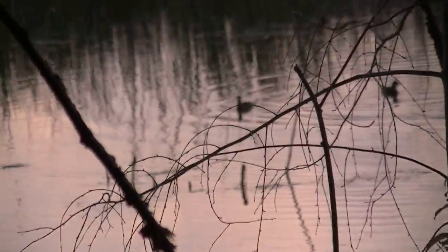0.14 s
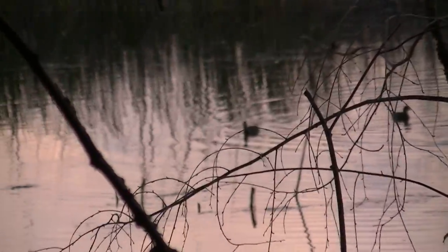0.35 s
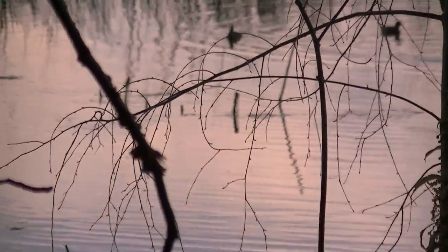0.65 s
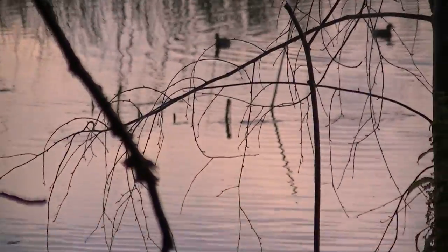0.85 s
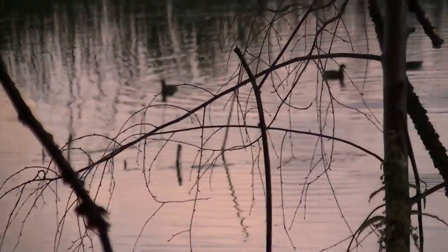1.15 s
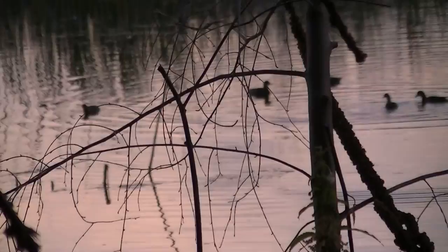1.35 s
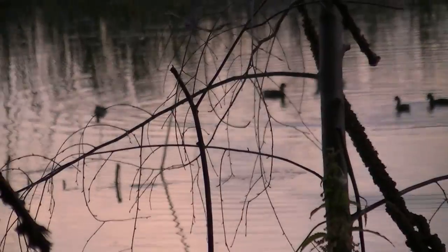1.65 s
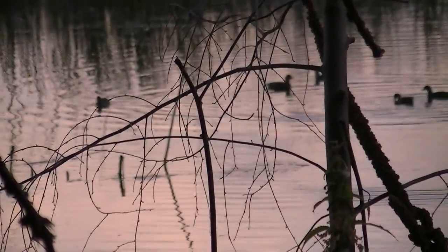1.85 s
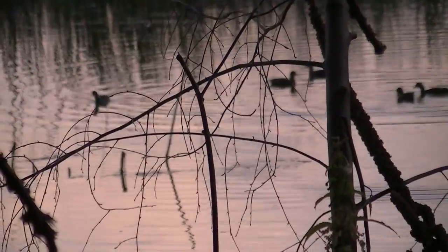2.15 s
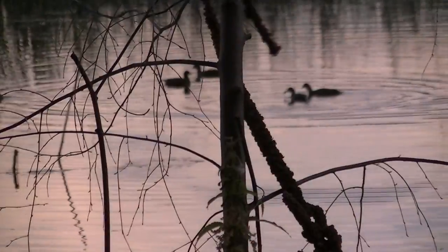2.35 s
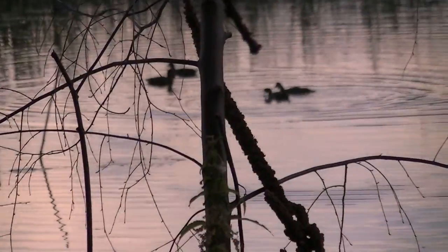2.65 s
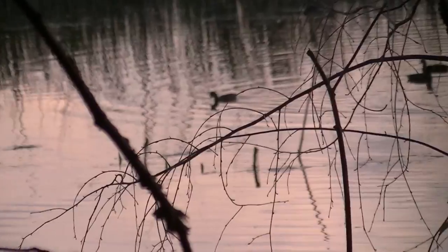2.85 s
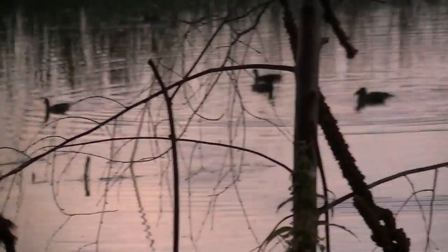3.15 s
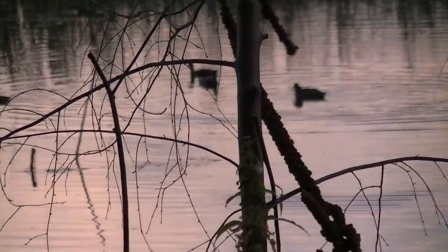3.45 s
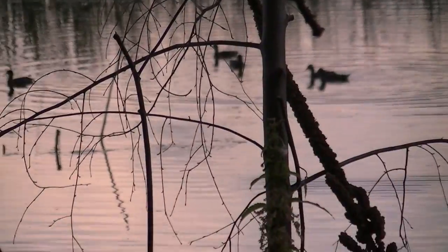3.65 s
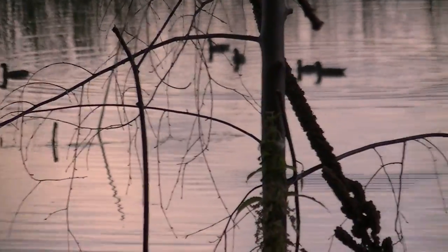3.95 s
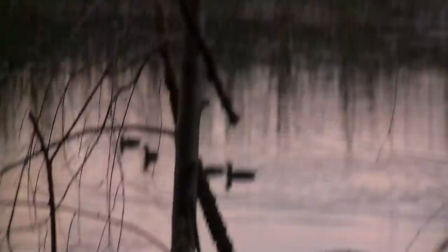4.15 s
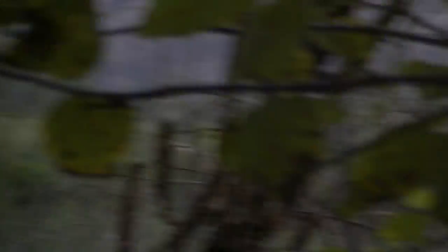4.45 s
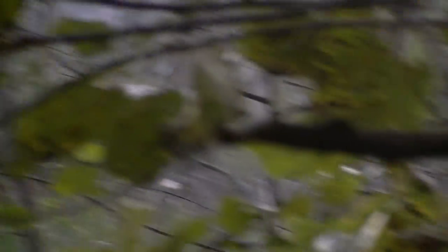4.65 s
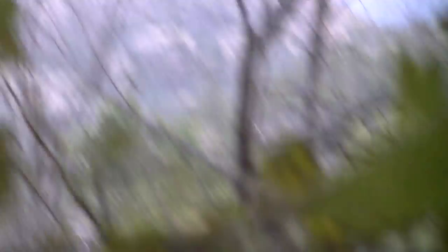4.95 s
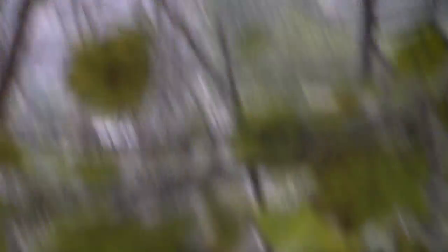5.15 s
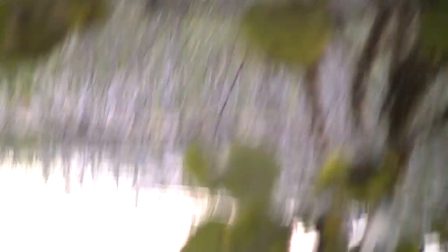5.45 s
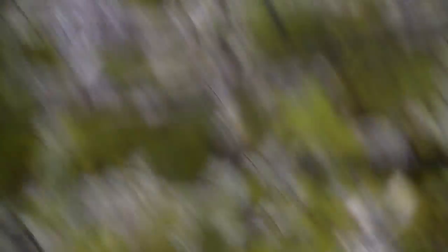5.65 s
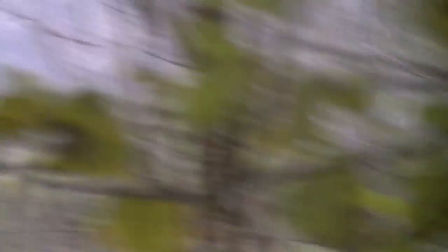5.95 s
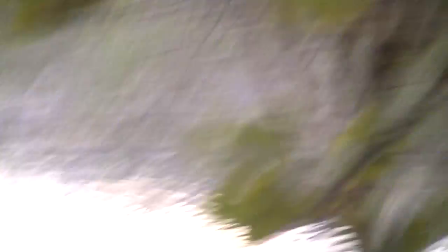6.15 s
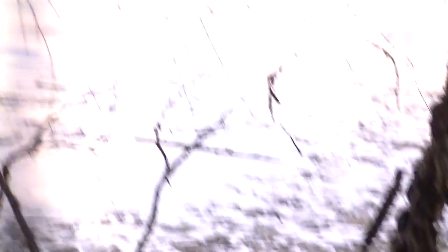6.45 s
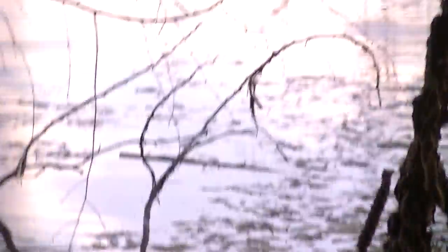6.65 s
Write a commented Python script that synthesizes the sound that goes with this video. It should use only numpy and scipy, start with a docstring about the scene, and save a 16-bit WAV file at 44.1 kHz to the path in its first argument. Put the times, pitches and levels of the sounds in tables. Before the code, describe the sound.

Dry twigs snap, knock and scrape close to the microphone in irregular bursts, with leaves rustling over a faint distant wash of air and water.

```python
"""A short rub of wood opens over a soft, distant wash of air and water: a pond bank, dry twigs and leaves close by.
A hand-held camera is pushed about among them: twigs snap and knock, bark and leaves drag past in short strokes,
a thick branch hisses along the camera body, and late on leaf stalks twang.
Wood, fibres, hiss and wash have a part both microphone ports share and a part that differs;
a stalk sends the same ring to both parts. Wood is ringing modes, leaves are noise bursts, strokes are random slips."""
import sys
import numpy as np
from scipy import signal
from scipy.fft import rfft, irfft, next_fast_len
from scipy.io import wavfile
from scipy.ndimage import uniform_filter1d

SR = 44100
rng = np.random.default_rng(int(sys.argv[2]) if len(sys.argv) > 2 else 0)


def unload_wav(signal):
    """Save mono or channel-first audio to the path in sys.argv[1] as 16-bit WAV at rate SR, clipped to [-1, 1]."""
    wavfile.write(
        sys.argv[1],
        SR,
        np.round(np.clip(np.atleast_2d(signal).T, -1, 1) * 32767).astype(np.int16),
    )


N = 299439
# Sounds have two rows, the shared and the unshared part; their levels are those ahead of the ports.


def gain_of(db):
    """Decibels to gain."""
    return 10 ** (np.asarray(db) / 20)


def evened(x):
    """Scales to rms 1."""
    return x / np.sqrt(np.mean(x ** 2) + 1e-20)


def read(points, hz):
    """Reads a table on a log-frequency axis."""
    f, value = np.transpose(points)
    return np.interp(np.log(hz + 1), np.log(f + 1), value)


def colour(x, points):
    """Filters by a spectrum in dB without delay."""
    size = next_fast_len(x.shape[-1])
    gain = gain_of(read(points, np.fft.rfftfreq(size, 1 / SR)))
    return irfft(rfft(x, size) * gain, size)[..., :x.shape[-1]]


def add(mix, s, sound):
    """Mixes a sound in at s seconds."""
    part = mix[:, round(s * SR):][:, :sound.shape[1]]
    part += sound[:, :part.shape[1]]


def wash():
    """Distant wash of air and water: coloured noise whose patches drift in time and frequency."""
    # spectrum of the far wash: (f/Hz, density/dB per Hz)
    wash_spectrum = [(60, -19), (301, -18.5), (458, -4.5), (651, -2.5), (880, 2.5), (1110, -3), (1310, -2),
                     (7060, -24.5), (16000, -45)]
    # level of the far wash: (t/s, level/dB)
    wash_level = [(0, -53), (1.3, -49.5), (1.8, -54), (3.6, -51.5), (4.2, -49), (6.79, -49.5)]
    a, b, c, d, patches = rng.standard_normal((N // 256 + 5, 513, 5)).T
    patches = uniform_filter1d(patches, size=14, axis=0)  # across frequency
    patches = evened(uniform_filter1d(patches, size=10, axis=1))  # along time
    spectrum_db = read(wash_spectrum, np.fft.rfftfreq(1024, 1 / SR))[:, None]
    z = np.array([a + 1j * b, c + 1j * d]) * gain_of(spectrum_db + 2.3 * patches)
    noise = signal.istft(z, nperseg=1024, noverlap=768)[1][:, :N]
    level_db = np.interp(np.arange(N) / SR, *np.transpose(wash_level))
    return gain_of(level_db) * evened(noise)


def ring(pitch_hz, hold, db_per_octave=9.0, detune=0.122, contact_s=0.0027, chatter=0.11,
         blow=4.8, blow_s=0.00088, size=10):
    """A blow and its chatter ring the wood; modes near the pitch of the struck part speak loudest."""
    # modes of the wood ahead of detuning, pitch and hold: (f/Hz, level/dB, 60 dB decay/s)
    wood_modes = [(333, -25, 0.03), (589, -12.5, 0.1), (907, 2, 0.052), (1180, -0.5, 0.015),
                  (1580, 5, 0.048), (2050, 5.5, 0.022), (2360, -3, 0.097), (3400, -1.5, 0.026),
                  (4230, -5.5, 0.022)]
    t = np.arange(3000) / SR
    hz, db, t60 = np.transpose(wood_modes)[:, :, None]
    hz = hz * (1 + detune * (2 * rng.random((2, 4) + hz.shape) - 1))  # four close neighbours a mode
    db = db - db_per_octave * abs(np.log2(hz / pitch_hz)) - 60 * t / (t60 * hold)
    polarity = rng.choice([-1, 1], hz.shape)
    modes = (gain_of(db) * np.cos(2 * np.pi * hz * t) * polarity).sum((1, 2))
    modes = modes * (1 + blow * np.exp(-t / blow_s))  # the first swings stand out above the ring
    rattle = rng.standard_normal((2, 400)) * np.exp(-t[:400] / contact_s)
    strike = (t[:400] == 0) + chatter * rattle
    # wood gives a little under the blow
    soft = signal.oaconvolve(strike, signal.windows.hann(M=size)[None], axes=1)
    # thin twigs send out little bass
    thin = signal.butter(N=3, Wn=pitch_hz / 2.5, btype="high", fs=SR, output="sos")
    return signal.sosfilt(thin, signal.fftconvolve(modes, soft, axes=1)[:, :3000])


def fibres(t60, crisp_db=0., rise_s=0.000096, patchy_db=7.0):
    """A burst of fast-dying noise, each with its own colour; crisp_db tilts it per octave about 5 kHz."""
    # leaf spectrum ahead of tilt and patches: (f/Hz, density/dB per Hz)
    leaf_spectrum = [(300, -29), (1500, -3.5), (2800, 1.5), (4200, -4.5), (5000, -6), (6100, -10.5),
                     (7600, -20), (8800, -19.5), (11000, -28.5), (12300, -32), (16000, -52)]
    t, (hz, db) = np.arange(3000) / SR, np.transpose(leaf_spectrum)
    db = db + crisp_db * np.log2(hz / 5000) + patchy_db * rng.standard_normal(len(hz))
    noise = colour(rng.standard_normal((2, 3000)), np.transpose([hz, db]))
    return noise * gain_of(-60 * t / t60) * (1 - np.exp(-t / rise_s)) ** 2


def slips(per_s, spread_db, voices, level):
    """Random stick-slip clicks of uneven size under a level curve, each sounding one of the given voices."""
    happens = rng.random(N) < per_s / SR
    size = gain_of(spread_db * np.minimum(rng.exponential(1, N), 4)) * happens
    size = level * evened(size)
    pick = rng.integers(0, len(voices), N)
    out = np.zeros((2, N))
    for k, voice in enumerate(voices):
        clicks = (size * (pick == k))[None]
        out += signal.oaconvolve(clicks, voice / np.linalg.norm(voice[0]), axes=1)[:, :N]
    return out


def contact():
    """Most strokes swell to a turn and ease off, some stay level or dip there; rows: three woods, two leaves."""
    # strokes past the camera, levels ahead of sharing, smoothing and surges: (start t/s, length/s,
    # turn as share of length 0-1, wood level/dB at the turn, leaf level/dB at the turn,
    # drop from the turn to the ends/dB (below 0: a rise), thinness of the wood 0-1)
    drags = [(0, 0.017, 0, -27, -47, 40, 0.33), (0.528, 0.059, 0.4, -38.5, -71, 9.5, 0.27),
             (0.616, 0.067, 0, -24.5, -54, 25.5, 0), (0.836, 0.077, 0.1, -34, -69, 27, 0.9),
             (1.048, 0.07, 0.74, -23, -49, 12, 0.86), (1.166, 0.157, 0.14, -26, -51, 8.5, 0.66),
             (2.209, 0.071, 1, -27.5, -46.5, 18, 0.18), (2.741, 0.11, 0.45, -30.5, -49, 18, 0.04),
             (2.898, 0.064, 1, -42.5, -60, 10, 0.67), (3.011, 0.052, 0.5, -41, -62, -7, 0.22),
             (3.072, 0.12, 1, -34.5, -44.5, 15.5, 0.51), (3.385, 0.14, 0.07, -40.5, -52, 11.5, 0.07),
             (3.901, 0.3, 0.46, -46, -50.5, 12.5, 0.24), (4.201, 0.24, 0.07, -36, -50, 18, 0.14),
             (4.509, 0.085, 0.9, -44, -49.5, 11.5, 0.32), (5.096, 0.053, 0.5, -40.5, -40, 12, 0.46),
             (5.151, 0.05, 0.8, -56, -38.5, 14, 0.5), (5.255, .12, 0.1, -40.5, -31.5, 4, 0.14),
             (5.387, 0.11, 0.07, -41, -45.5, 19, 0.97), (5.465, 0.046, 0.4, -45, -37.5, 7, 0.93),
             (5.535, 0.52, 1, -40, -48, 25.5, 0.94), (6.097, 0.29, 0.1, -30, -51.5, 0, 0.17),
             (6.376, 0.088, 0.1, -25, -46, 4, 0.19), (6.459, 0.13, 0.96, -40.5, -68, 24, 0.25),
             (6.687, 0.14, 0.42, -27.5, -49.5, 16.5, 0.26)]
    # share of crisp leaves in the brush around the camera: (t/s, share 0-1)
    crispness = [(0, 0.65), (4.7, .05), (5.05, 1), (5.5, 1), (6.1, 0.55), (6.79, 1)]
    leaf_share = 0.35  # leaves follow the level course of a stroke less than wood does
    level = np.zeros((5, N))
    for start, length, turn, wood_db, leaf_db, end_drop_db, thin in drags:
        u = np.linspace(0, 1, round(length * SR))
        turn = np.clip(turn, 1 / SR, 1 - 1 / SR)
        drop_db = end_drop_db * np.maximum(1 - u / turn, (u - turn) / (1 - turn))
        rub = gain_of(wood_db - drop_db)
        rustle = gain_of(leaf_db - leaf_share * drop_db)
        crisp = np.interp(start, *np.transpose(crispness))
        woods = [np.interp(thin, [0, .2, 1], row) for row in np.eye(3)]  # thick, middling, thin
        share = np.clip(woods + [1 - crisp, crisp], 0, 1)[:, None]
        add(level, start, np.sqrt(share) * [rub, rub, rub, rustle, rustle])
    letting_go = np.exp(-1 / (0.0048 * SR))  # branches slide off gradually
    level = signal.lfilter([1 - letting_go], [1, -letting_go], level)
    surge = uniform_filter1d(rng.standard_normal(N), size=500)
    surge = evened(uniform_filter1d(surge, size=500))
    return level * gain_of(2.27 * surge)  # the contact surges unevenly


def strokes():
    """Dragging makes dense slips in thick, middling and thin wood, and finer ones in limp and crisp leaves."""
    wood = [[ring(hz * k, 0.82) for k in np.linspace(.8, 1.25, num=8)] for hz in (330, 900, 2200)]
    leaves = [[fibres(t60, tilt_db) for t60 in np.geomspace(.006, .03, num=16)] for tilt_db in (-4., 6.)]
    level = contact()
    rubbing = sum(slips(700, 3.82, voices, x) for voices, x in zip(wood, level))
    rustling = sum(slips(1500, 5.3, voices, x) for voices, x in zip(leaves, level[3:]))
    # thin twigs and limp leaves tick now and then throughout
    stray = slips(23, 3.3, wood[-1] + leaves[0], gain_of(-63))
    return rubbing + rustling + stray


def snaps():
    """Each breaking twig is a ring of wood with a crack of splitting fibres on top."""
    # twigs break: (t/s, peak wood level/dB, struck part f/Hz, peak crack level/dB)
    breaks = [(0.521, -17, 665, -35), (0.531, -15.5, 1550, -35), (0.667, -19.5, 1030, -30),
              (0.694, -29, 2500, -31), (0.875, -26, 1400, -39), (0.987, -29, 2100, -34.5),
              (1.046, -18.5, 970, -31), (1.086, -16, 1740, -41), (1.158, -15, 1900, -29),
              (1.317, -23, 1600, -35), (1.57, -35.5, 1500, -38), (1.681, -25.5, 1400, -35),
              (1.69, -26, 1170, -32.5), (2.272, -18.5, 1210, -20.5), (2.606, -26.5, 1520, -31.5),
              (4.087, -20, 1700, -19), (4.243, -23, 1030, -26.5), (4.288, -34, 890, -25.5),
              (4.379, -13.5, 1170, -34), (4.385, -13, 970, -23.5), (4.418, -16.5, 882, -33.5),
              (4.552, -30.5, 3160, -29), (4.615, -26, 1420, -28), (5.12, -33, 2130, -33),
              (5.184, -32, 2300, -33), (5.223, -44, 2050, -31), (5.249, -17.5, 1600, -17),
              (5.285, -21, 1810, -12.5), (5.312, -38, 3200, -33), (5.366, -3.5, 1480, -28),
              (5.496, -39, 2060, -22), (5.535, -19.5, 910, -23.5), (5.67, -33, 1960, -31),
              (5.708, -29, 2070, -37), (6.013, -6, 756, -8), (6.071, -6.5, 1080, -27),
              (6.107, -6, 920, -23), (6.146, -9.5, 950, -39), (6.171, -6.5, 920, -31), (6.2, -4, 1290, -42),
              (6.313, -10, 1010, -29), (6.347, -9.5, 1590, -20.5), (6.457, -17, 2050, -22),
              (6.505, -26.5, 970, -29.5), (6.631, -22, 2660, -30), (6.676, -19, 2220, -29)]
    out = np.zeros((2, N))
    for s, db, hz, crack_db in breaks:
        wood = ring(hz, 0.99)
        crack = fibres(0.016, 0.079, patchy_db=-1.0)
        wood = gain_of(db) * wood / abs(wood[0]).max()
        crack = gain_of(crack_db) * crack / abs(crack[0]).max()
        add(out, s, wood + crack)
    return out


def hiss():
    """A thick branch sliding along the camera body hisses: bright noise swelling and fading with each slide."""
    # slides along the camera body: (start t/s, length/s, level/dB)
    slides = [(0.542, 0.026, -48), (2.237, 0.05, -43.5), (2.748, 0.11, -48), (2.888, 0.085, -56.5),
              (3.097, 0.075, -46.5)]
    # colour laid on noise that already rises with frequency: (f/Hz, gain/dB)
    slide_colour = [(4000, 8), (5200, -8), (6000, 7), (7400, -5), (10400, -34), (12400, -31)]
    level = np.zeros((1, N))
    for start, length, db in slides:
        add(level, start, gain_of(db) * signal.windows.tukey(round(length * SR), 0.6)[None])
    rising_noise = np.diff(rng.standard_normal((2, N + 1)))
    return level * evened(colour(rising_noise, slide_colour))


def knocks():
    """Twigs knock without breaking: a softer blow with more chatter, a shorter ring and no crack."""
    # twigs knock together: (t/s, peak level/dB, struck part f/Hz)
    taps = [(0.618, -6, 980), (1.066, -23, 1770), (1.099, -8.5, 1580), (1.109, -7.5, 1580),
            (1.116, -14.5, 1490), (1.14, -13.5, 1480), (1.17, -23, 1600), (1.194, -13.5, 1730),
            (1.225, -6, 1810), (1.239, -7, 1500), (1.251, -13.5, 1700), (1.263, -9, 1450),
            (1.301, -12, 1460), (1.361, -21.5, 1514), (1.701, -27, 1080), (1.732, -27.5, 1450),
            (2.222, -22.5, 1020), (2.793, -18, 630), (3.05, -24.5, 1600), (3.039, -21, 1590),
            (3.569, -30.5, 970), (4.097, -16.5, 950), (3.016, -33, 1600), (6.133, -9.5, 1280),
            (6.152, -8, 1000), (6.218, -10, 845), (6.236, -13.5, 900), (6.246, -17, 950),
            (6.279, -19, 1690), (6.33, -21, 1220), (6.372, -11.5, 990), (6.424, -21.5, 970),
            (6.483, -23, 900), (6.59, -8.5, 1190)]
    out = np.zeros((2, N))
    for s, db, hz in taps:
        wood = ring(hz, 0.66, chatter=0.19, blow=3.1, size=11)
        add(out, s, gain_of(db) * wood / abs(wood[0]).max())
    return out


def stalks():
    """Flicked leaf stalks ring briefly in a few decaying modes, alike in both parts."""
    # flicks of a leaf stalk: (t/s, peak level/dB)
    flicks = [(5.121, -28), (5.133, -28), (5.183, -38), (5.221, -34), (5.479, -35), (5.499, -34)]
    # modes of the stiff stalks of crisp leaves: (f/Hz, relative level/dB)
    stalk_modes = [(2050, 4), (2840, -16), (3220, 1), (3800, -1)]
    t60_s = 0.1
    out, t = np.zeros((2, N)), np.arange(3000) / SR
    stalk = sum(gain_of(db - 60 * t / t60_s) * np.sin(2 * np.pi * hz * t) for hz, db in stalk_modes)
    for s, db in flicks:
        add(out, s, gain_of(db) * stalk[None] / abs(stalk).max())
    return out


def scene():
    """Shared plus unshared part makes the left, shared minus unshared the right."""
    # colour of the unshared part: (f/Hz, gain/dB)
    unshared_colour = [(150, -17), (600, -18.5), (1300, -17.5), (2400, -12), (5000, -15.5), (12000, -22.5)]
    shared, unshared = wash() + strokes() + snaps() + hiss() + knocks() + stalks()
    unshared = colour(unshared, unshared_colour)
    return np.array([shared + unshared, shared - unshared])


def record(dry):
    """Microphone ports lean left or right by band, a wind filter cuts the bass, then the band limit."""
    # lean of the port pair: (f/Hz, left over right level/dB)
    lean = [(300, 1), (1200, -1.5), (5000, -.5)]
    wind_hz, edge_hz = 200., 16100
    ports = np.array([colour(x, np.array(lean) * [1, sign / 2]) for x, sign in zip(dry, (1, -1))])
    wind_filter = signal.butter(N=4, Wn=wind_hz, btype="high", fs=SR, output="sos")
    cut = signal.sosfilt(wind_filter, ports)
    band_limit = signal.firwin(511, edge_hz, window=("kaiser", 9), fs=SR)
    return signal.oaconvolve(cut, band_limit[None], "same", axes=1)


dry = scene()
out = record(dry)
unload_wav(out)
```